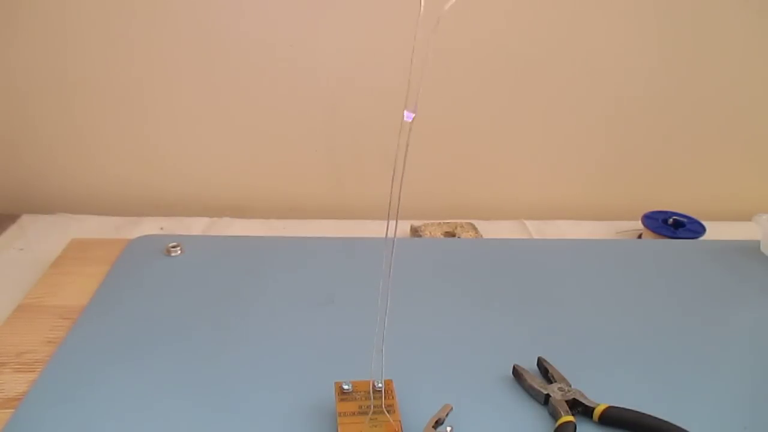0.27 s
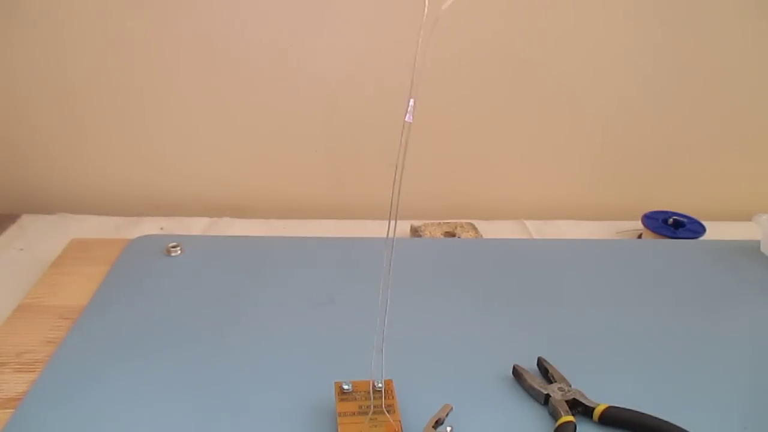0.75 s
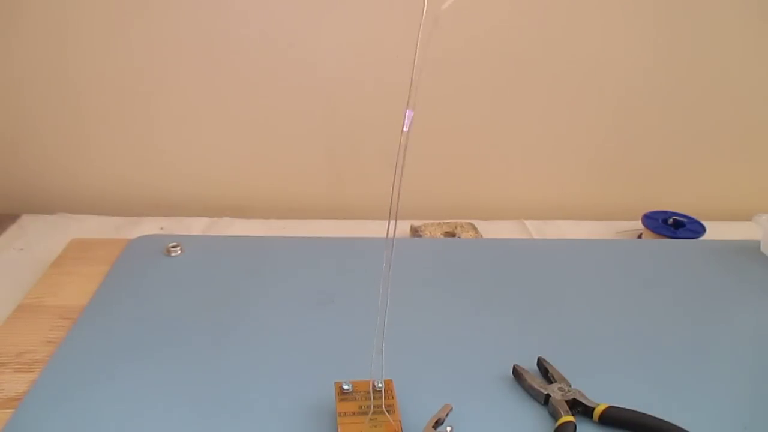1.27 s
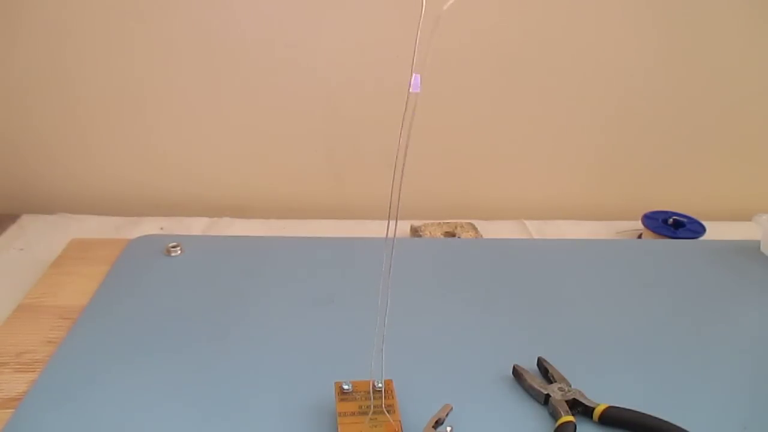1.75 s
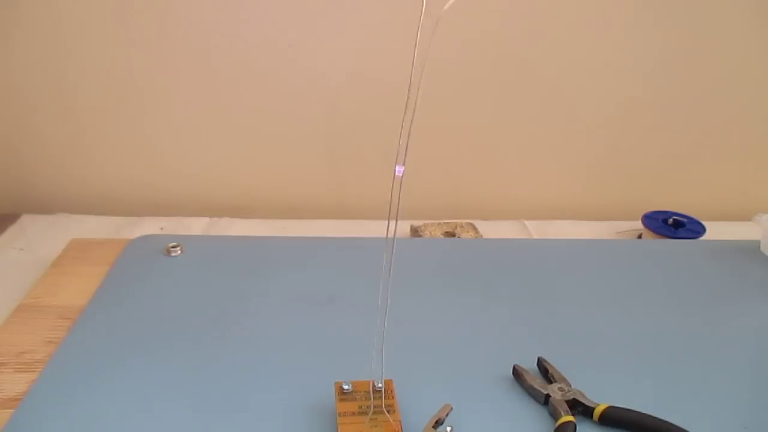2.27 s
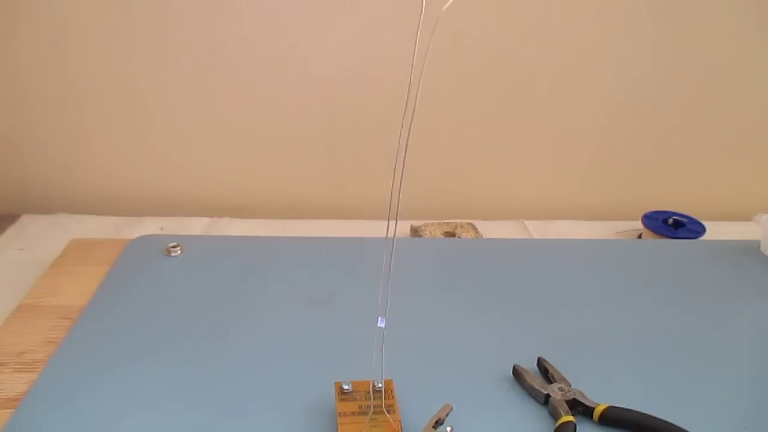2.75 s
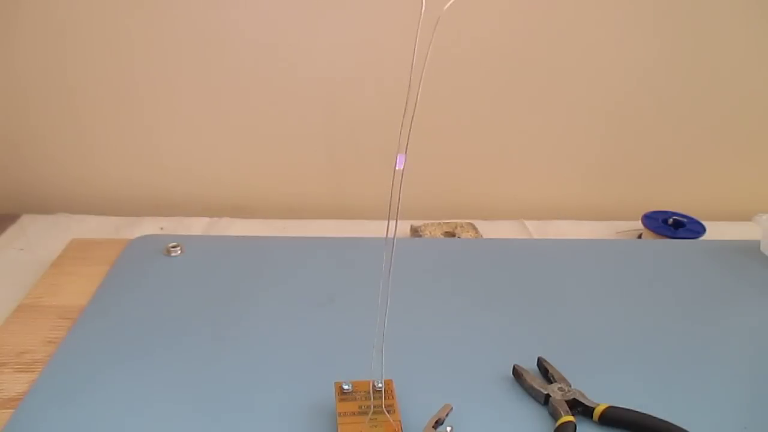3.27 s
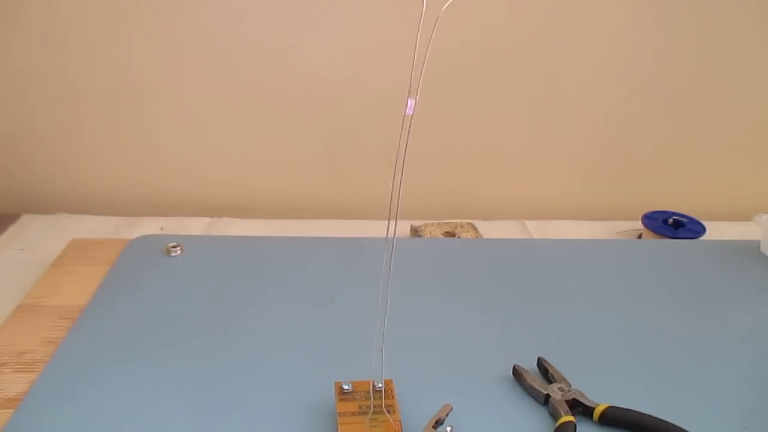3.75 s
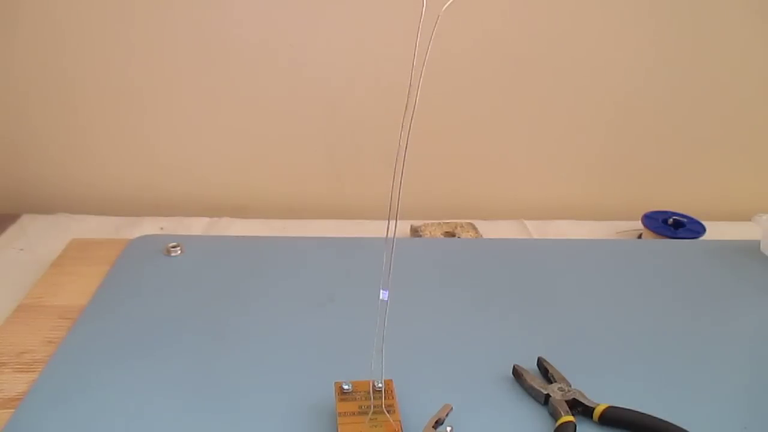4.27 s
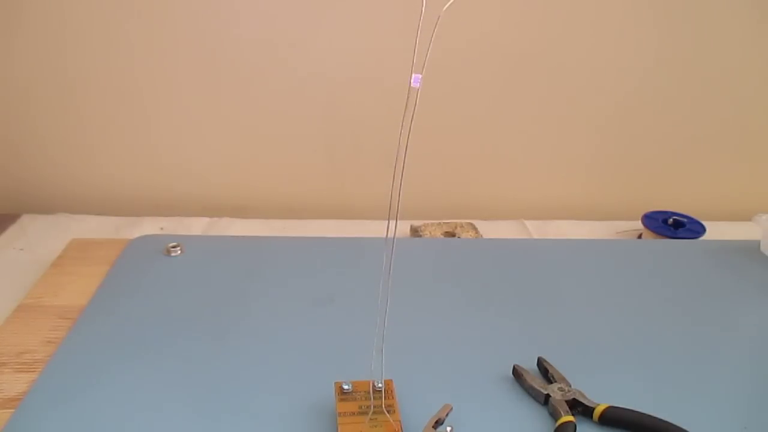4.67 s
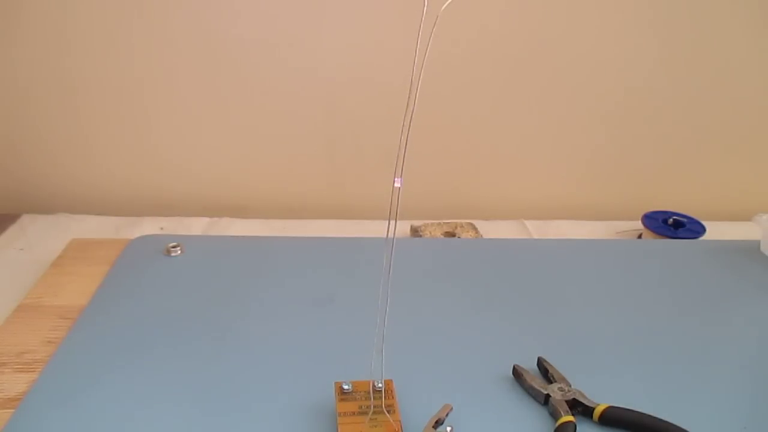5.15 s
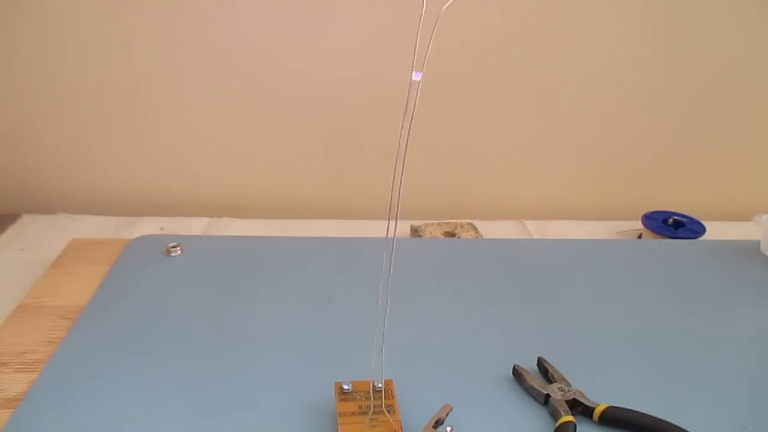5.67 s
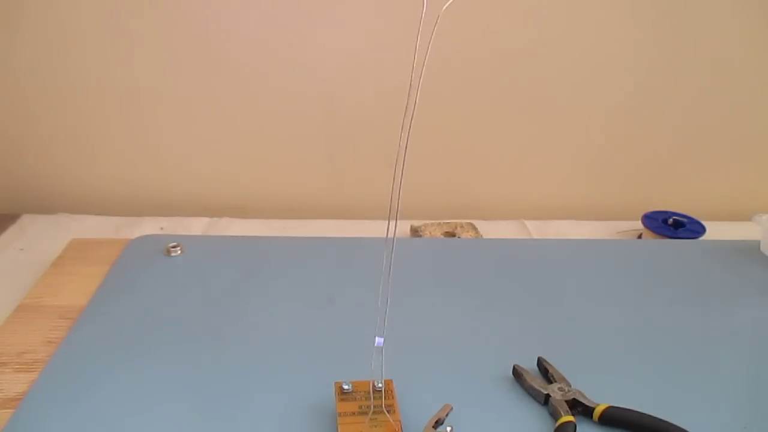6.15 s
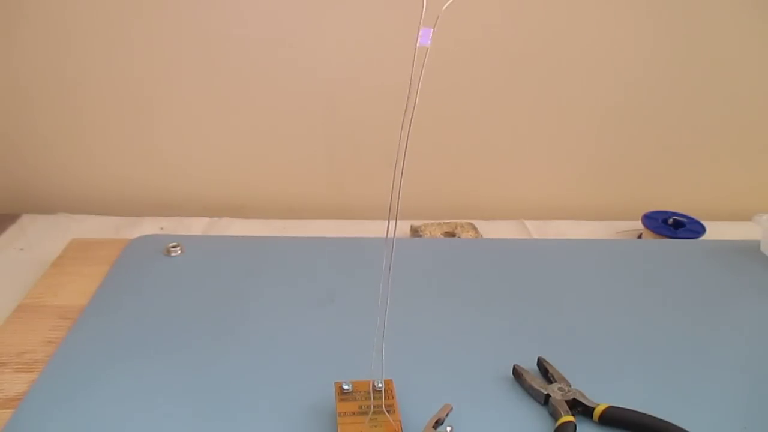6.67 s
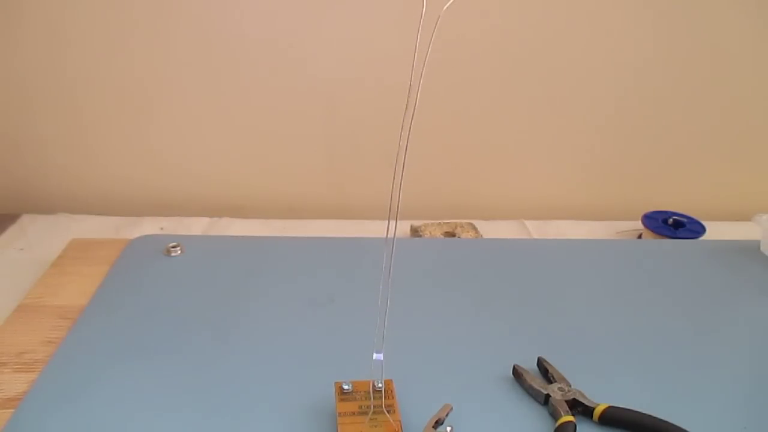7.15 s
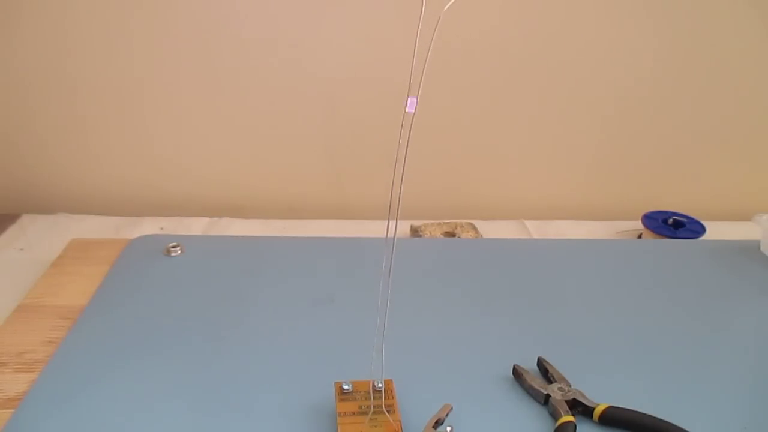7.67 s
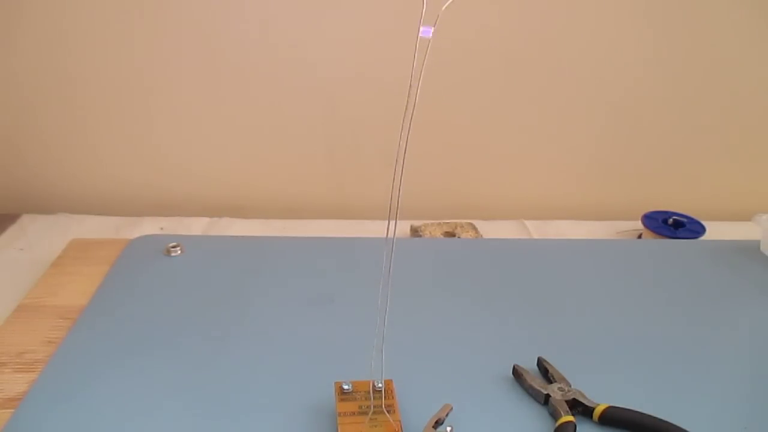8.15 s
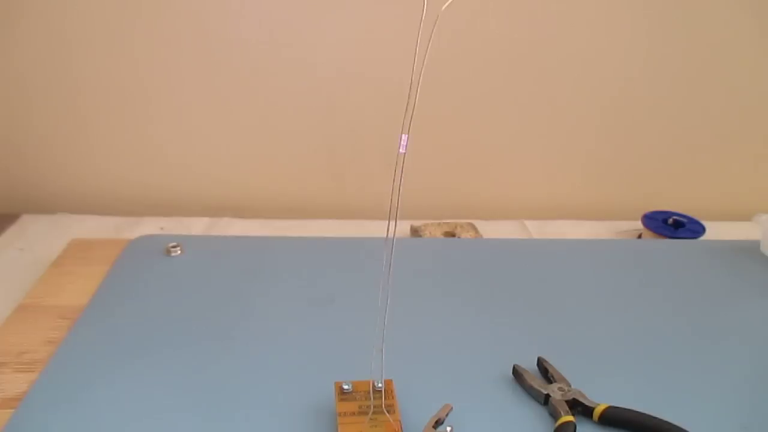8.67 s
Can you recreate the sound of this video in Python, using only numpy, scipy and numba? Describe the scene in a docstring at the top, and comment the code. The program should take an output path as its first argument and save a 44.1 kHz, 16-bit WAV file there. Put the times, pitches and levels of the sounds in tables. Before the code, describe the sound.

A small high-voltage arc heard close in a small, dry indoor room. Its shrill, ragged buzz throbs rapidly for the first two and a half seconds, with tiny chirps, then steadies into repeated climbs from thin whistle to louder rasping sizzle, most ending in a short crackle as it strikes again lower. Faint room noise and low traffic rumble lie underneath.

```python
"""Room with far traffic: a small high-voltage arc climbs between two upright wires, breaks, strikes again lower.
Arc: chaotic train of some 4000 sparks/s hopping between a short, a middle and a long spacing.
Narrow gap: ragged whistle; wide gap: louder rasp. Side streamers add sizzle, most restrikes a short crackle.
At first the wires sway and make it throb. Below lie filtered room noise, traffic rumble and a two-partial engine."""
import sys
import numpy as np
from scipy import signal
from scipy.fft import rfft, irfft, next_fast_len
from scipy.io import wavfile
from scipy.ndimage import uniform_filter1d, map_coordinates
from numba import njit

SR = 44100
rng = np.random.default_rng(int(sys.argv[2]) if len(sys.argv) > 2 else 0)


def wav_out(sig):
    """Save sig, one row per channel (or a flat mono array), as 16-bit PCM at SR to the path in sys.argv[1]."""
    wavfile.write(sys.argv[1], SR, np.round(np.clip(np.atleast_2d(sig).T, -1, 1) * 32767).astype(np.int16))


N = 392490

# room noise spectrum, relative: freq_hz, density_db
AIR_SPECTRUM = [(100, -12.5), (140, -9), (280, -7.5), (420, -5), (540, -1), (660, -4), (850, -6.5),
                (1020, -6), (1400, -14.5), (2000, -14.5), (8000, -59)]
# far traffic spectrum, relative: freq_hz, density_db
ROAD_SPECTRUM = [(90, -20.5), (110, -13.5), (136, 4), (165, -6.5), (200, 2.5), (270, -9), (360, -3),
                 (480, -6.5), (700, -31)]
# far traffic level: time_s, level_db
ROAD_LEVEL = [(0, -51.5), (2.5, -51), (3.8, -46), (6, -46), (7.5, -46), (8.9, -41.5)]
# deep rumble level: time_s, level_db
DEEP_LEVEL = [(0.0, -51.5), (0.07, -45), (2.6, -51), (3.2, -48), (4.31, -51), (4.73, -43), (5.25, -51),
              (5.53, -45.5), (5.62, -64), (5.75, -42), (5.97, -36), (6.57, -47), (7.11, -38), (8.03, -52),
              (8.18, -52), (8.9, -44)]
# drone level: time_s, level_db
DRONE_LEVEL = [(0, -41), (1.2, -41.5), (2.2, -44.5), (2.6, -39.5), (3.15, -34), (3.32, -40), (3.55, -30),
               (3.9, -41), (4.5, -40.5), (4.73, -40), (5, -43), (6.7, -44), (7.3, -46), (7.7, -44),
               (8.9, -41)]
# deep rumble and drone spectra, relative: freq_hz, density_db
DEEP_SPECTRUM = [(15, -34), (28, -22), (38, -1), (45, -12), (60, -34), (200, -66)]
DRONE_SPECTRUM = [(35, -41), (50, -6.5), (58, 3.0), (65, -12.0), (80, -27), (250, -48)]
# far engine, lower partial's pitch and octave partial's level: time_s, pitch_hz, level_db
ENGINE = [(7.2, 169.3, -70.5), (7.68, 170.6, -50), (7.95, 171.5, -40.5), (8.1, 172, -43),
          (8.32, 173.5, -49), (8.52, 177, -37.5), (8.9, 172.6, -43.5)]
# room decay: freq_hz, t60_s
ROOM_DECAY = [(500, 0.078), (4000, 0.16), (14000, 0.021)]
# restrike crackle spectrum, relative: freq_hz, density_db
SNAP_SPECTRUM = [(400, -14), (1500, 12.5), (5000, 8), (10000, 0), (15800, -24)]
# swing modes of the wires, fast then slow: rate_hz, widest_gap_at_s
SWAY_MODES = [(11.5, .0235), (4.97, .211)]
# fast swing: time_s, depth_gap
FAST_SWAY = [(0, 0.61), (.9, 0.59), (1.499, .47), (2.2, .38), (2.6, .05), (3, 0.05)]
# slow swing: time_s, depth_gap
SLOW_SWAY = [(0, 0.04), (.7, 0.02), (1.35, .18), (1.95, .36), (2.25, .1), (2.6, 0.03)]
# stretches of the arc's path; most end in a snap and a lower restrike, a few pass on silently;
# gap 0 narrow, 1 wide: end_s, first_gap, last_gap, flared_top_s, level_db, snap_db
STRETCHES = [(1.28, .42, .34, 0, -19, -70), (2.13, .33, 0.53, 0.001, -17.5, -70),
             (2.55, .24, .2, 0, -18.5, -70), (2.893, 0.027, 0.83, 0.0011, -19.5, -32),
             (3.188, .17, 0.59, 0.0083, -19.5, -46), (3.471, 0.096, .2, 0.094, -19.5, -32),
             (3.711, 0.39, 0.67, 0.0039, -18.5, -35), (4.019, 0.24, .2, 0.13, -18, -32),
             (4.388, 0.054, 0.58, 0.0038, -19.5, -39), (4.817, .48, .03, .13, -19, -39),
             (5.075, 0.19, .1, 0.14, -19.5, -34), (5.438, 0.21, .2, .14, -19, -32),
             (5.648, 0.33, .1, 0.1, -18, -31), (5.798, .12, .3, 0.094, -17.5, -46),
             (6.274, 0.057, .78, 0, -19.5, -40), (6.423, .25, .2, 0.078, -17, -34.5),
             (6.573, .2, .05, 0.11, -18.5, -32), (6.738, 0.34, .1, 0.11, -18.5, -32),
             (6.9, 0.37, 0.16, 0, -19.5, -60), (7.201, .08, .76, 0, -19.5, -32),
             (7.527, 0.021, .68, 0, -19.5, -36), (7.827, 0.32, .15, 0.12, -19, -45),
             (8.018, 0.42, .15, 0.11, -19, -46), (8.225, .27, .1, .12, -18, -28),
             (8.603, .15, 0.87, 0, -19, -37), (8.95, .17, 0.077, 0, -19.5, -75)]
# sparks fall into step and chirp: start_s, length_s, pitch_hz, glide_hz, target_level_db
CHIRPS = [(.251, 0.0098, 3350, 421.5, -15), (.425, 0.019, 3337, 390, -15), (0.688, 0.023, 3480, 374.5, -15),
          (.842, 0.016, 3555, -89, -29), (.911, .009, 3580, -55, -12.5), (.938, .015, 3321, 240, -21.5),
          (4.069, .014, 3730, 14.5, -21), (4.912, .01, 3525, 146, -14.5),
          (5.285, 0.013, 3590, 100.5, -14.5), (8.705, 0.025, 3730, 55, -19)]
# spark spacings (rows short, middle, long) at a narrow gap:
# spacing_ms, scatter_ms, next_short_odds, next_middle_odds, next_long_odds
NARROW = [(.133, .004, .29, .65, .06), (.269, .0045, .21, .775, .015), (.364, .01, .13, .63, .24)]
# the same at a wide gap: spacing_ms, scatter_ms, next_short_odds, next_middle_odds, next_long_odds
WIDE = [(.119, .005, .62, .16, .22), (.249, .004, .005, .335, .66), (.361, .004, .005, .42, .575)]
# readiness for long waits: gap, odds_factor
LONG_WAITS = [(0, .8), (.22, .9), (.43, 1.9), (.74, .6), (1, 1.4)]
# radiation of one spark: freq_hz, gain_db
SPARK_SPECTRUM = [(300, -39), (1200, -17.5), (1750, -10), (2400, -6.5), (3000, -1.2), (3700, 4), (5200, 3),
                  (6400, -10.5), (8000, -3), (9300, -8.5), (10400, -11.5), (11200, -9.5), (12200, -20.5),
                  (13000, -24), (15400, -18)]
# side streamer spectrum, relative: freq_hz, gain_db
SIZZLE_SPECTRUM = [(1200, -9.5), (2000, -1.5), (5000, -7), (9000, 10), (13000, -7.5), (15800, -18)]
# peaks and dips from bench reflections: centre_hz, width_hz, gain_db
BENCH = [(2480, 62, 5.5), (2644, 190, -6.5), (2973, 123, 7.5), (3037, 180, -4.5), (3380, 200, 4.5),
         (4416, 98, -10), (4560, 89, 7.5), (5140, 140, 4.5)]

TOP_HZ = 15750
# where the wires part: gap, opening time, level step, further swell
FLARE_GAP, FLARE_ENTRY_S, FLARE_DB, FLARE_GROWS_DB = 1.0, .04, 2.15, 1.5
LOUDER_DB, SIZZLIER_DB = 0.5, 20  # rise from narrow to wide
STRAIN_DB, STRAIN_S = 9, .025  # sizzle flares up around a stretch's end, more at a wide gap
SIZZLE_DB, FLARE_CALMS_DB = -40.5, 9.5  # at gap 0.5; the long arc in the flare sheds fewer streamers
SWAY_SIZZLE_DB = 3.5  # per unit depth of fast sway: moving wires tear at the arc
SWAY_FEED = 1.52  # arc power follows the swing, down to a tenth
HISS_HZ, HISS_HZ_PER_GAP, HISS_TOP_HZ, HISS_WIDTH_HZ, HISS_DB = 10100, 4900, 13400, 980, -5  # dB re streamers


def amp(db):
    """Decibels to gain."""
    return 10 ** (np.asarray(db) / 20)


def unit(x):
    """x at rms 1."""
    return x / np.sqrt(np.mean(x ** 2) + 1e-20)


def even(x, size=900):
    """x at a running rms of 1; window in samples."""
    return x / np.sqrt(np.abs(uniform_filter1d(x ** 2, size)) + 1e-12)


def along(points, hz):
    """Interpolate (Hz, value) points on a log axis."""
    f, v = np.transpose(points)
    return np.interp(np.log(hz + 1), np.log(f + 1), v)


def curves(rows):
    """One value per sample for each column after the time."""
    s, *columns = np.transpose(rows)
    return [np.interp(np.arange(N) / SR, s, column) for column in columns]


def wobble(rate_hz):
    """Smooth random curve, rate_hz knots a second."""
    knots = rng.standard_normal(int(N * rate_hz / SR) + 4)
    return map_coordinates(knots, [np.arange(N) * rate_hz / SR])


def coloured(x, colour_db):
    """x through the causal minimum-phase filter of gain colour_db(Hz), by folding the cepstrum."""
    m = 2 * next_fast_len(N // 2 + SR // 4)
    cepstrum = irfft(np.log(amp(colour_db(np.fft.rfftfreq(m, 1 / SR)))))
    cepstrum[1:m // 2] *= 2
    cepstrum[m // 2 + 1:] = 0
    return irfft(rfft(x, m) * np.exp(rfft(cepstrum)))[:N]


def noise(spectrum):
    """Noise of rms 1 with the given spectrum."""
    return unit(coloured(rng.standard_normal(N), lambda hz: along(spectrum, hz)))


def clicks(at, sizes):
    """Band-limited impulses at fractional sample positions (windowed sinc)."""
    taps = np.floor(at).astype(int)[:, None] + np.arange(-7, 9)
    d = taps - at[:, None]
    shape = np.sinc(d) * np.cos(np.pi * d / 16) ** 2
    return np.bincount(np.clip(taps, 0, N).ravel(), (sizes[:, None] * shape).ravel(), N + 1)[:N]


def far_engine():
    """One far engine: a partial and its stronger octave, unsteady in pitch."""
    pitch_hz, level_db = curves(ENGINE)
    turn = 2 * np.pi * np.cumsum(pitch_hz + 0.76 * wobble(18)) / SR
    return amp(level_db) * (np.sin(2 * turn) + 0.41 * np.sin(turn))


def background(air_db=-43):
    """Room noise, traffic rumble through the walls and the engine."""
    deep_db, drone_db = curves(DEEP_LEVEL)[0], curves(DRONE_LEVEL)[0]
    deep = amp(deep_db) * even(noise(DEEP_SPECTRUM), size=9000)
    drone = amp(drone_db) * even(noise(DRONE_SPECTRUM), size=9000)
    engine = far_engine()
    road = amp(curves(ROAD_LEVEL)[0]) * noise(ROAD_SPECTRUM)
    air = amp(air_db) * noise(AIR_SPECTRUM)
    return air + road + deep + drone + engine


def room(x):
    """Short unit-energy noise tail, 5 ms late, treble dying first."""
    hz, t, z = signal.stft(rng.standard_normal(SR // 3), SR, nperseg=256)
    decay_db = -60 * t / along(ROOM_DECAY, hz)[:, None]
    tail = signal.istft(z * amp(decay_db), SR, nperseg=256)[1]
    response = np.pad(tail / np.linalg.norm(tail), (SR // 200, 0))
    return signal.fftconvolve(x, response)[:N]


def strikes(snap_db=0, t60_s=0.024):
    """Air breaks down afresh: noise rising to and falling from a stretch's end, inaudible at the silent ones."""
    t = np.arange(N) / SR
    envelope = sum(amp(db - 60 * np.abs(t - end_s) / t60_s) for end_s, *_, db in STRETCHES)
    return amp(snap_db) * envelope * noise(SNAP_SPECTRUM)


def sway():
    """Swing of the gap in two wire modes: fast one settling, slow one swelling until about 2 s, then dying away."""
    t = np.arange(N) / SR
    return sum(curves(depth)[0] * np.cos(2 * np.pi * rate_hz * (t - widest_s))
               for depth, (rate_hz, widest_s) in zip((FAST_SWAY, SLOW_SWAY), SWAY_MODES))


def arc_path():
    """Gap, level, sizzle: gap drifts evenly along each stretch, opens wide if the arc reaches the flared top."""
    t = np.arange(N) / SR
    ends = np.array(STRETCHES)[:, 0]
    which = np.minimum(np.searchsorted(ends, t), len(ends) - 1)
    end, first, last, flare_s, db, _ = np.array(STRETCHES)[which].T
    start, flare_at = np.append(0, ends)[which], end - flare_s
    progress = np.clip((t - start) / np.maximum(flare_at - start, 1e-6), 0, 1)
    gap = first + (last - first) * progress

    in_flare_s = np.maximum(t - flare_at, 0)
    opened = np.minimum(in_flare_s / FLARE_ENTRY_S, 1)
    gap = gap + opened * (FLARE_GAP - gap)
    swell = (in_flare_s / np.maximum(flare_s, 1e-6)) ** 2
    db = db + LOUDER_DB * (gap - .5) + FLARE_DB * opened + FLARE_GROWS_DB * swell

    strain = np.clip(gap, 0, 1) * np.exp(-np.abs(end - t) / STRAIN_S)
    sizzle_db = SIZZLE_DB + SIZZLIER_DB * (gap - .5) - FLARE_CALMS_DB * opened + STRAIN_DB * strain
    return gap, db, sizzle_db


def arc_state(sway_gap=.85, wander=.08, drift=.07, drift_db=0.87, flicker_db=1.5, calm_db=5):
    """Gap, level and sizzle of the climbing, swaying arc; chirp pitch (0 while sparks are chaotic)."""
    t = np.arange(N) / SR
    gap, db, sizzle_db = arc_path()
    swing, stumble = sway(), wobble(28)
    swing_db = 10 * np.log10(np.maximum(1 + SWAY_FEED * swing, .1))
    # the arc's feet hop along the wires, so its length never rests
    gap = np.clip(gap + sway_gap * swing + drift * stumble + wander * wobble(110), -.3, 1.05)
    db = db + swing_db + drift_db * stumble + flicker_db * wobble(520)

    chirp_hz = np.zeros(N)
    for start_s, length_s, pitch_hz, glide_hz, chirp_db in CHIRPS:
        inside = (t > start_s) & (t < start_s + length_s)
        chirp_hz[inside] = pitch_hz + glide_hz * (t[inside] - start_s) / length_s
        locked = uniform_filter1d(1. * inside, size=560)
        db = db + locked * (chirp_db - db)
        sizzle_db = sizzle_db - locked * calm_db
    sizzle_db = sizzle_db + swing_db + SWAY_SIZZLE_DB * curves(FAST_SWAY)[0]
    return gap, db, sizzle_db, chirp_hz


@njit
def spark_times(gap, lean, chirp_hz, narrow, wide, dice, scatter):
    """Each spark leaves the air hot, so its spacing sets the odds of the next; a wide gap favours long waits."""
    at, now, kind, n = np.zeros(len(dice)), 0., 1, 0
    while now < len(gap) and n < len(dice):
        at[n] = now
        g, pitch_hz = gap[int(now)], chirp_hz[int(now)]
        rules = narrow + min(max(g, 0.), 1.) * (wide - narrow)
        rules[:, 4] *= lean[int(now)]  # odds of a long wait
        odds = np.cumsum(rules[kind, 2:])
        kind = int(np.sum(odds[:2] < dice[n] * odds[2]))
        spacing_ms = narrow[kind, 0] + g * (wide[kind, 0] - narrow[kind, 0])
        wait_ms = spacing_ms + rules[kind, 1] * scatter[n]
        if pitch_hz > 0:  # in step: one spark per chirp period
            kind = 1
            wait_ms = 1000 / pitch_hz + narrow[1, 1] * scatter[n]
        now += wait_ms * SR / 1000
        n += 1
    return at[:n]


def weak_sparks(at, gap, narrow_size=0.22, wide_size=0.073):
    """Current rings on between full sparks: up to two crests of a wait give weak ones. Times, sizes."""
    waits = np.diff(at)
    crests = np.round(waits / (WIDE[0][0] * SR / 1000) - .1)
    step = waits / np.maximum(crests, 1)
    times = np.concatenate([(at[:-1] + k * step)[crests > k] for k in (1, 2)])
    here = times.astype(int)
    sizes = np.interp(gap[here], [0, 1], [narrow_size, wide_size])
    return times, sizes * np.exp(0.53 * wobble(700)[here])


def rising_hiss(gap):
    """Narrow hiss band, rms 1, rising as the arc lengthens: low-passed noise on a gliding carrier."""
    hz = np.minimum(HISS_HZ + HISS_HZ_PER_GAP * gap, HISS_TOP_HZ)
    turn = 2 * np.pi * np.cumsum(hz) / SR
    band = [(HISS_WIDTH_HZ / 3, 0), (HISS_WIDTH_HZ, -15), (HISS_WIDTH_HZ * 4, -60)]
    return unit(noise(band) * np.cos(turn) + noise(band) * np.sin(turn))


def bench_db(hz):
    """Resonance-shaped peaks and dips of the bench reflections."""
    return sum(gain_db / (1 + (2 * (hz - centre_hz) / width_hz) ** 2) for centre_hz, width_hz, gain_db in BENCH)


def arc(level_db=-0.02, sputter_db=2.0):
    """Each spark gives a push of air; its thin side streamers add a sizzle."""
    gap, db, sizzle_db, chirp_hz = arc_state()
    mood = np.exp(.95 * wobble(80))  # for some ms long waits come easier or harder
    lean = mood * np.interp(gap, *np.transpose(LONG_WAITS))
    dice, scatter = rng.random(N // 4), rng.standard_normal(N // 4)
    at = spark_times(gap, lean, chirp_hz, np.array(NARROW), np.array(WIDE), dice, scatter)
    sizes = np.exp(.1 * rng.standard_normal(len(at)))
    streamer_signs = rng.choice([-1., 1.], len(at))

    pushes = clicks(at, sizes) + clicks(*weak_sparks(at, gap))
    buzz = coloured(pushes, lambda hz: along(SPARK_SPECTRUM, hz) + bench_db(hz))
    streamers = clicks(at, streamer_signs)
    sizzle = unit(coloured(streamers, lambda hz: along(SIZZLE_SPECTRUM, hz) + bench_db(hz)))
    sizzle = sizzle + amp(HISS_DB) * rising_hiss(gap)
    return amp(db + level_db) * even(buzz) + amp(sizzle_db + sputter_db * wobble(420)) * sizzle


def scene(room_db=-15):
    """Arc close by, its room answer and the background; two identical channels."""
    near = arc() + strikes()
    mono = near + amp(room_db) * room(near) + background()
    return np.array([mono, mono])


def record(dry):
    """Sharp band limit: nothing from TOP_HZ up."""
    m = next_fast_len(N + SR // 2)
    kept = np.fft.rfftfreq(m, 1 / SR) < TOP_HZ
    return irfft(rfft(dry, m) * kept, m)[:, :N]


dry = scene()
out = record(dry)
wav_out(out)
```